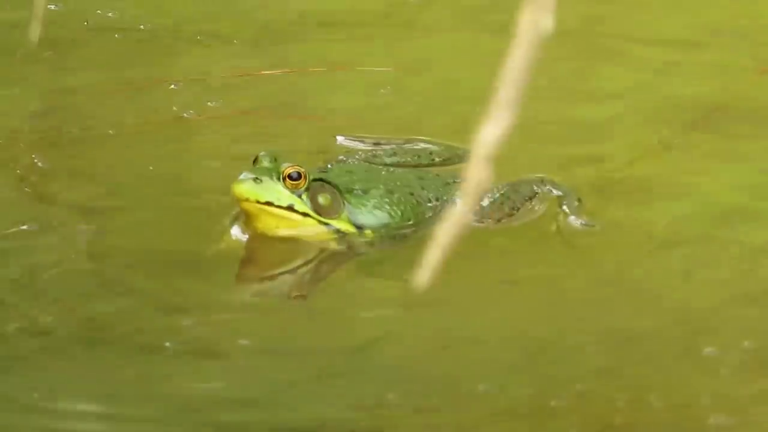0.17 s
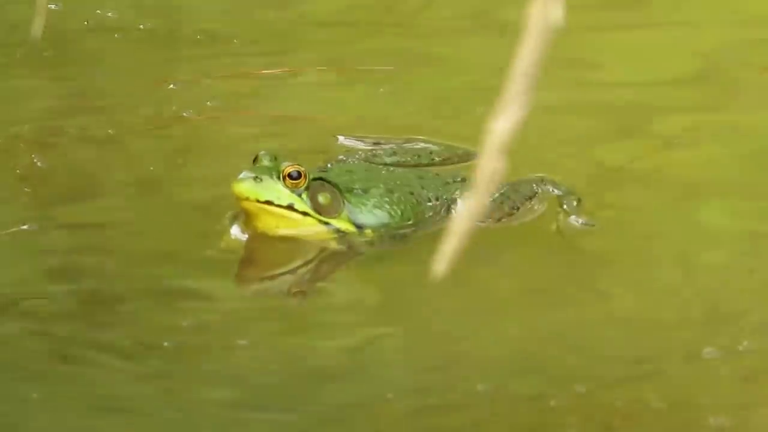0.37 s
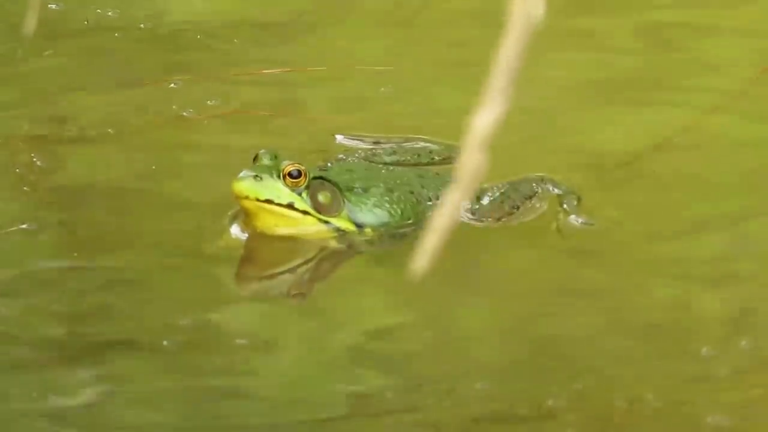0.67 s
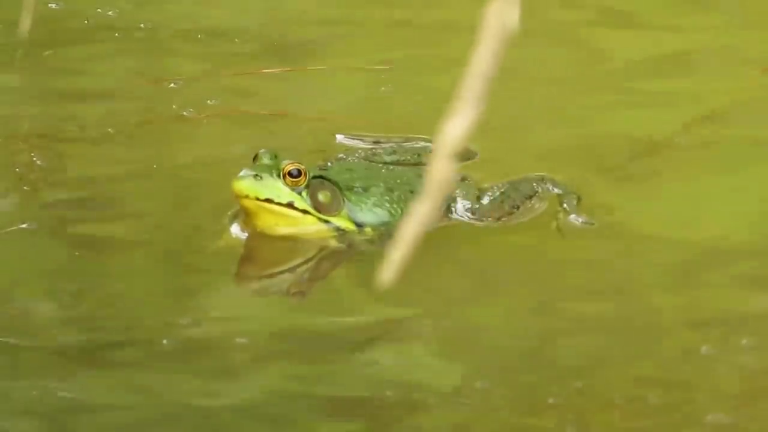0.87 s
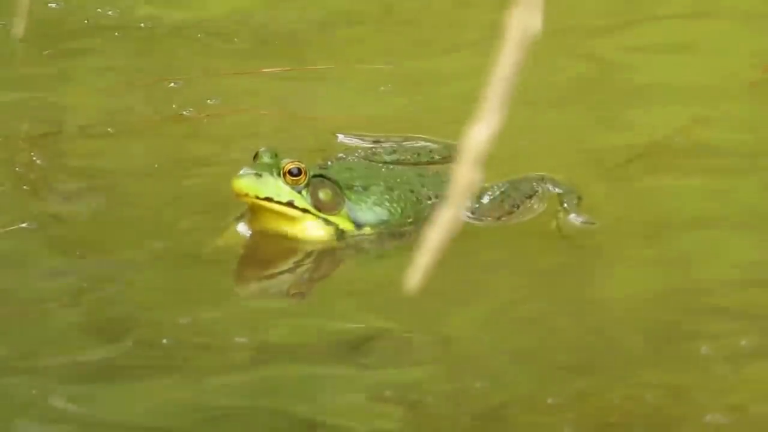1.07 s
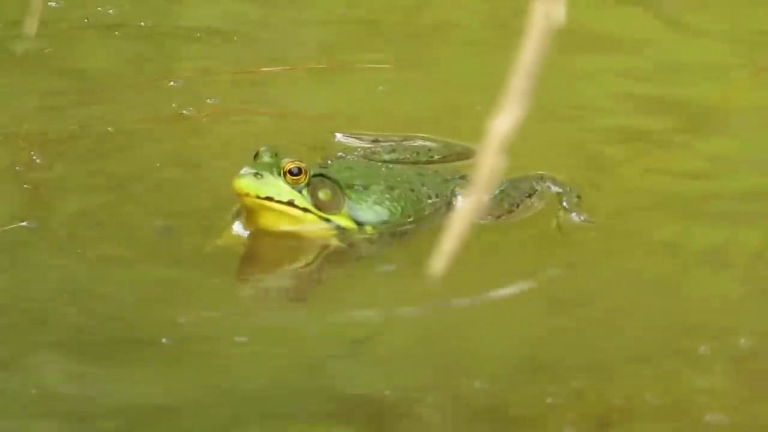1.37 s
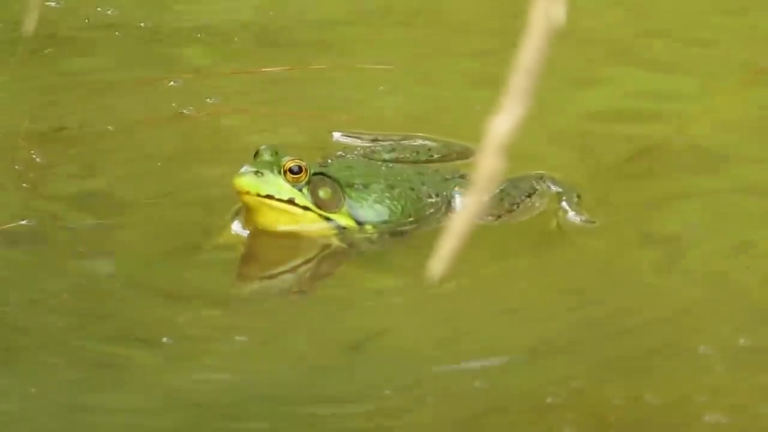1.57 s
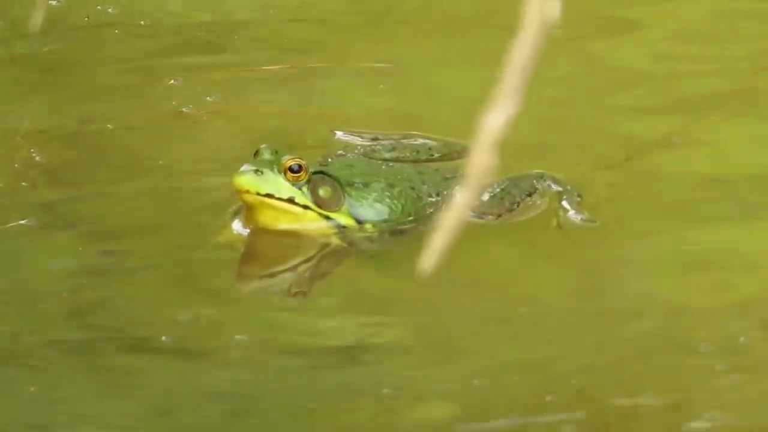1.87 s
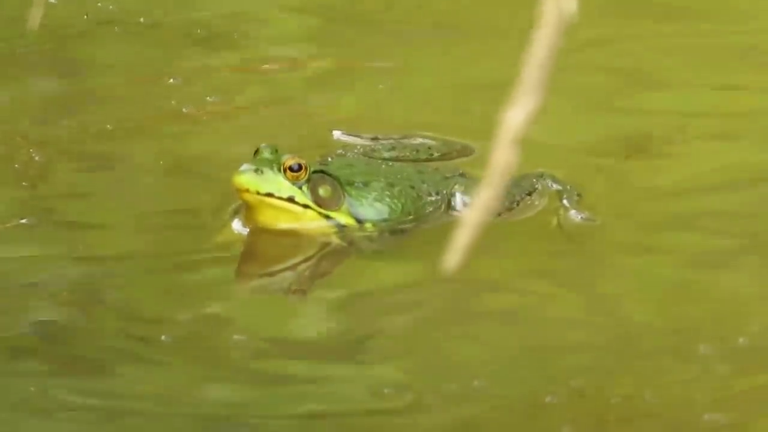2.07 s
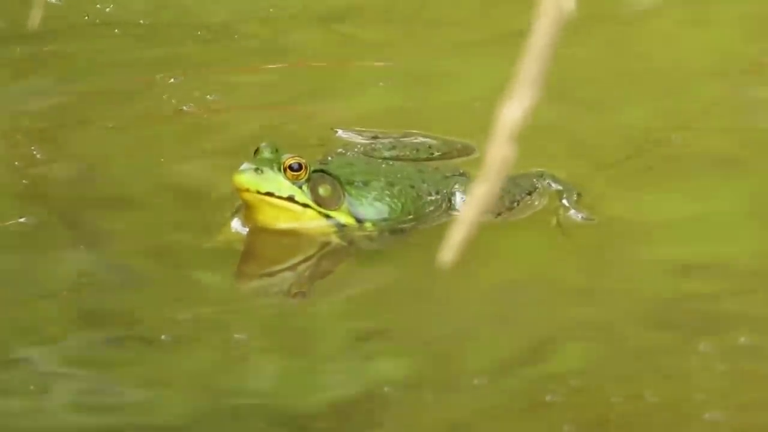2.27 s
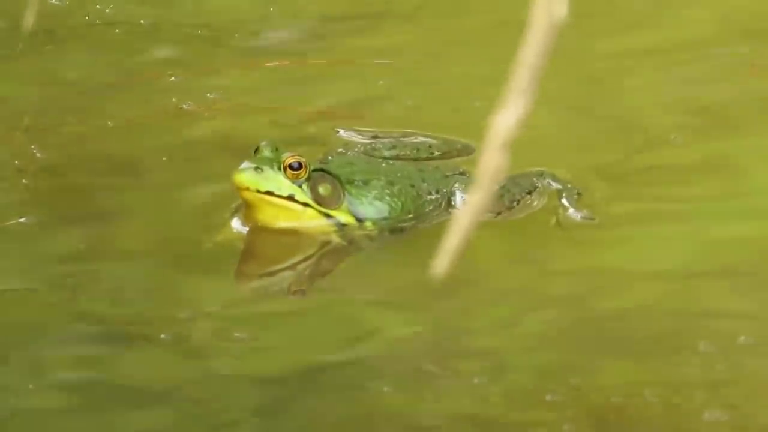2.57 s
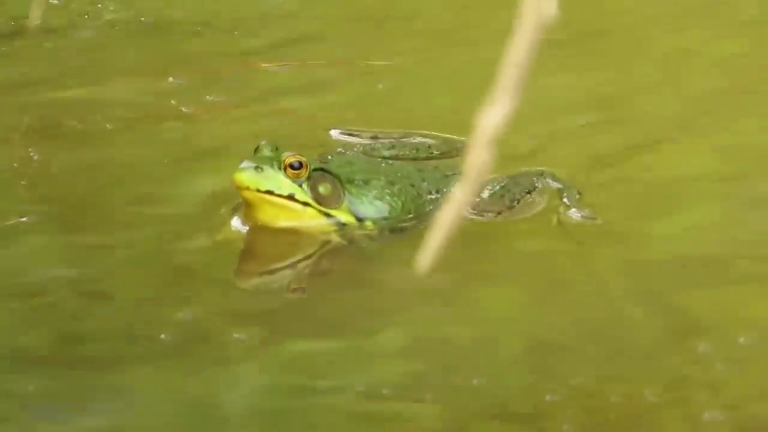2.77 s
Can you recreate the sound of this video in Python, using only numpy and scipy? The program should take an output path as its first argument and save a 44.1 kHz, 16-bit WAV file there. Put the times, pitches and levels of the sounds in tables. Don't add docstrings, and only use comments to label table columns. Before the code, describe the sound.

One frog gives a single brief, low, plucky twang midway, slightly left, over constant soft hiss. Faint high insects and a cricket continue, with a tiny bird tick later; outdoor pond, small camera's stereo microphone.

```python
import sys
import numpy as np
from scipy import signal
from scipy.fft import rfft, irfft
from scipy.io import wavfile
from scipy.ndimage import uniform_filter1d

SR = 44100
rng = np.random.default_rng(int(sys.argv[2]) if len(sys.argv) > 2 else 0)


def amplitude_ratio(level_db):
    exponent = np.asarray(level_db, float) / 20
    return 10 ** exponent


def waveform_to_disk(signal):
    frames = np.transpose(np.atleast_2d(signal))
    scaled = np.clip(frames, -1, 1) * 32767
    samples = np.round(scaled).astype(np.int16)
    wavfile.write(sys.argv[1], SR, samples)


N = 128772
T = np.arange(N) / SR
F = np.maximum(np.arange(N // 2 + 1) * SR / N, 1)


def filt(x, gain):
    return irfft(rfft(x) * gain, N)


def peak(hz, width):
    return 1 / (1 + 1j * (F / hz - hz / F) * hz / width)


def curve(table, axis=1):
    table = np.array(table)
    return np.interp(np.log(F), np.log(table[:, 0]), table[:, axis])


def walk(rate):
    hold = int(SR / rate)
    drift = np.repeat(rng.standard_normal(N // hold + 1), hold)
    drift = uniform_filter1d(uniform_filter1d(drift, hold), hold)
    return 1.4 * drift[:N]


def bump(start, length):
    return np.sin(np.pi * np.clip((T - start) / length, 0, 1)) ** 2


def stereo(mid, side):
    return np.array([mid + side, mid - side])


def noise_swells(table, relative_width):
    out = 0
    for start, length, hz, db in table:
        band = filt(rng.standard_normal(N), peak(hz, relative_width * hz) ** 2)
        out = out + amplitude_ratio(db) * bump(start, length) * band / band.std()
    return out


def hiss():
    # f/Hz, level/dB per Hz
    mid_hiss = [(20, -17), (45, -0.5), (115, -1), (300, -5), (950, -10), (3600, -17), (5000, -21),
                (7000, -25.5)]
    # f/Hz, level/dB per Hz
    side_hiss = [(20, -13), (60, -10.5), (122, 4.5), (260, 5.5), (600, -0.5), (1300, -11), (2600, -19.5),
                 (6900, -26.5)]
    # f/Hz, mid level/dB, side level/dB
    roll_off = [(8700, 0, -.3), (9350, -4, -5), (9600, -10, -13), (9750, -12.5, -15.5), (10600, -13, -13),
                (13600, -16, -13), (15130, -19, -16.5), (15200, -36, -34)]
    hiss_db, swell_db, flicker_db = -74.5, 1, .5
    swell = walk(0.94)
    channels = [0, 0]
    for k, table in enumerate((mid_hiss, side_hiss)):
        gain = amplitude_ratio(curve(table) + curve(roll_off, axis=k + 1) + hiss_db) * np.sqrt(SR / 2)
        for octave in range(10):
            distance = np.log2(np.clip(F, 32, 2 ** 14)) - 5 - octave
            share = np.cos(np.pi / 2 * np.clip(distance, -1, 1))
            level = amplitude_ratio(swell_db * swell + flicker_db * walk(8.97))
            channels[k] = channels[k] + level * filt(rng.standard_normal(N), gain * share)
    return stereo(*channels)


def chorus():
    # f/Hz, width/Hz, mid level/dB, side level/dB
    bands = [
        (7690, 260, -71, -72),
        (7890, 200, -72.5, -76),
        (8380, 150, -80.5, -77),
        (8750, 280, -80.5, -76),
        (7360, 200, -76.5, -74),
        (119.6, 47, -61, -72),
    ]
    throb_db, throbs_per_s = 2, 30

    def throbbing_band(hz, width):
        band = filt(rng.standard_normal(N), peak(hz, width) ** 2)
        band = band * amplitude_ratio(throb_db * walk(throbs_per_s))
        return band / band.std()

    out = 0
    for hz, width, mid_db, side_db in bands:
        mid = amplitude_ratio(mid_db) * throbbing_band(hz, width)
        side = amplitude_ratio(side_db) * throbbing_band(hz, width)
        out = out + stereo(mid, side)
    return out


def breeze():
    # t/s, length/s, f/Hz, level/dB
    puffs = [
        (0.252, 0.11, 90, -49),
        (1.29, 0.085, 135, -50),
        (2.2, 0.14, 90, -52),
        (1.8, 0.16, 130, -62),
        (0.47, 0.064, 170, -56),
        (0.671, 0.055, 250, -49.5),
        (1.6, 0.056, 130, -50.5),
        (0.05, 0.059, 170, -54.5),
        (2.42, 0.07, 73, -45),
        (2.68, 0.16, 110, -53.5),
    ]
    return noise_swells(puffs, 0.86)


def cricket():
    # t/s, length/s, level/dB
    chirps = [
        (.13, .085, -72),
        (.52, .06, -72),
        (.83, .06, -72),
        (1.10, .08, -72),
        (1.41, .055, -72),
        (1.725, .085, -71),
        (2.03, .07, -72),
        (2.335, .07, -72),
        (2.635, .07, -72),
    ]
    tone_hz, spread_hz, strokes_per_s = 9230, 40, 75
    tone = np.sin(2 * np.pi * np.cumsum(tone_hz + spread_hz * walk(66)) / SR)
    stroke_rate = strokes_per_s * (1 + 0.093 * walk(22))
    strokes = np.sin(np.pi * np.cumsum(stroke_rate) / SR) ** 2
    env = sum(amplitude_ratio(db) * bump(start - .005, length + .015) ** 0.21 for start, length, db in chirps)
    left_right = np.array([[-.5], [1]])
    return amplitude_ratio(11.5) * tone * strokes * env * left_right


def rasps():
    # t/s, length/s, f/Hz, level/dB
    insects = [
        (.67, 0.07, 8850, -67),
        (1.16, .05, 9200, -68),
        (1.86, 0.042, 8700, -67),
        (2.65, .04, 9600, -78),
    ]
    return noise_swells(insects, 0.03)


def frog():
    # f/Hz, width/Hz, level/dB
    sac = [
        (390, 200, 0),
        (570, 190, -.5),
        (1300, 300, -14),
    ]
    start_s, swell_s, fall_s = 1.4445, .021, .004
    pulse_hz, sag = 203, .1
    t = T - start_s
    phase = pulse_hz * t * (1 - sag * np.clip(t / 0.043, 0, 1))
    pulses = np.diff(np.floor(phase), prepend=0) * (t > 0)
    rise = np.clip(t / swell_s, 0, 1) ** 1.3
    fall = np.exp(-np.clip(t - swell_s, 0, 1) / fall_s)
    call = filt(pulses * rise * fall, sum(amplitude_ratio(db) * peak(hz, width) ** 2 for hz, width, db in sac))
    return amplitude_ratio(-34) * call / np.abs(call).max() * np.array([[1], [.6]])


def bird():
    start_s, length_s = 2.188, .031
    base_hz, rise_hz = 6900, 370
    glide = base_hz + rise_hz * np.clip((T - start_s) / length_s, 0, 1)
    whistle = np.sin(2 * np.pi * np.cumsum(glide) / SR)
    tick = whistle * bump(start_s, length_s) * amplitude_ratio(-53.5)
    echo = amplitude_ratio(-11) * np.roll(tick, int(0.027 * SR))
    return np.array([tick + echo, -.25 * tick + echo])


def scene():
    return hiss() + chorus() + breeze() + cricket() + rasps() + frog() + bird()


def band_limit(x):
    return signal.sosfilt(signal.butter(12, 15730, fs=SR, output="sos"), x)


def record(dry):
    right_treble_db, start_s, rise_s = 1, .0362, 0.00016
    tilt = amplitude_ratio(right_treble_db / 2 * np.clip((F - 2000) / 2000, 0, 1))
    mix = np.array([filt(dry[0], 1 / tilt), filt(dry[1], tilt)])
    unmute = np.clip((T - start_s) / rise_s, 0, 1)
    return band_limit(mix * unmute)


dry = scene()
out = record(dry)
waveform_to_disk(out)
```